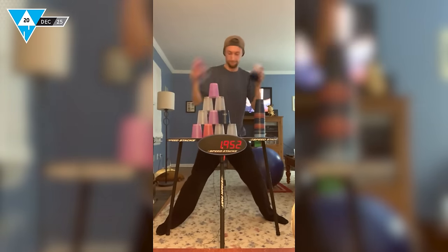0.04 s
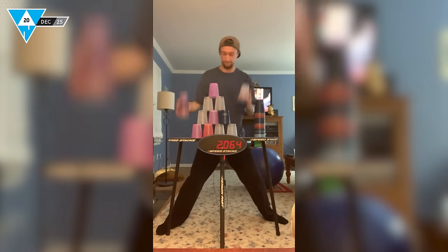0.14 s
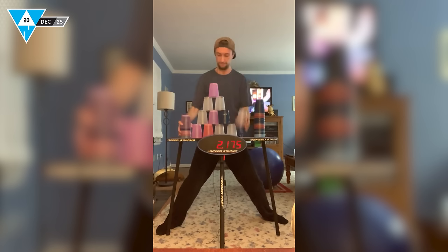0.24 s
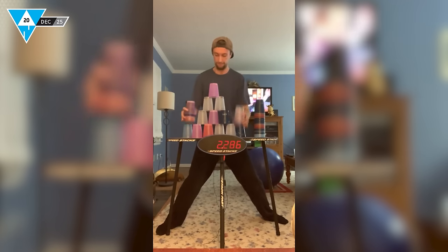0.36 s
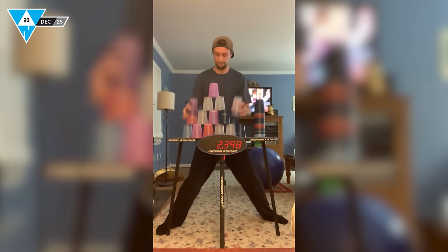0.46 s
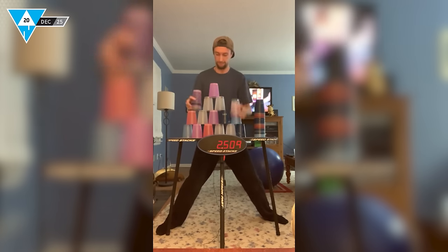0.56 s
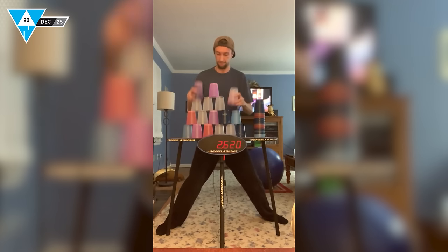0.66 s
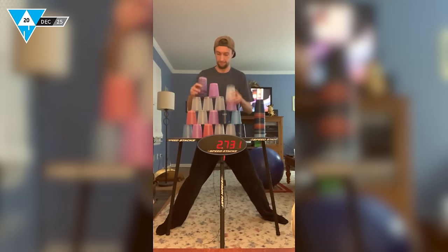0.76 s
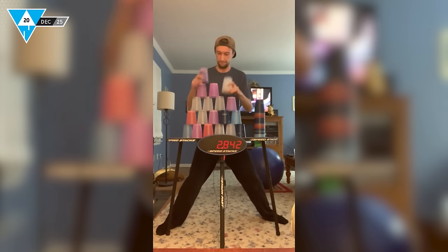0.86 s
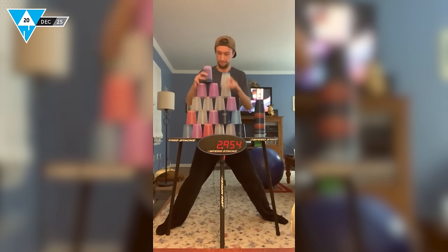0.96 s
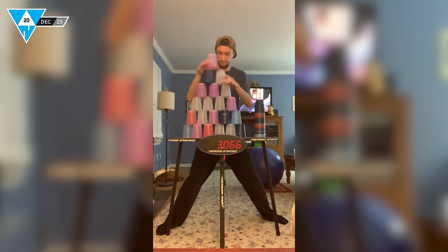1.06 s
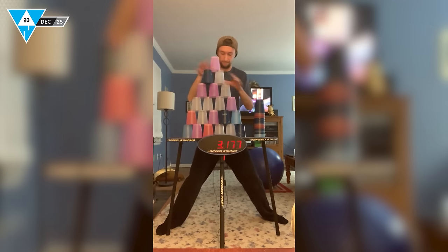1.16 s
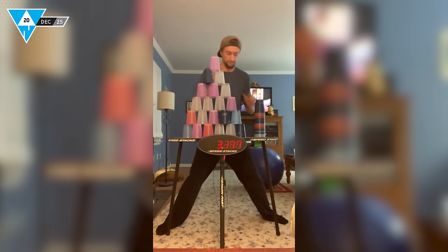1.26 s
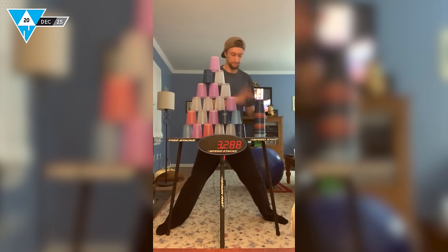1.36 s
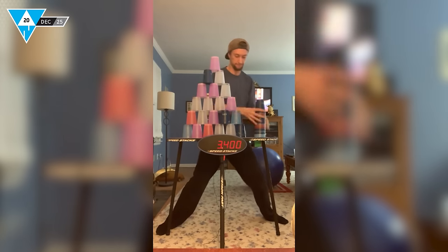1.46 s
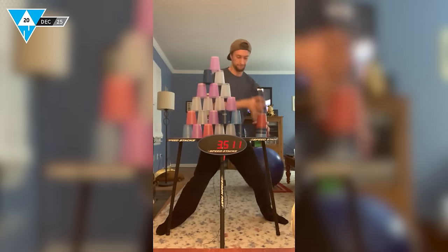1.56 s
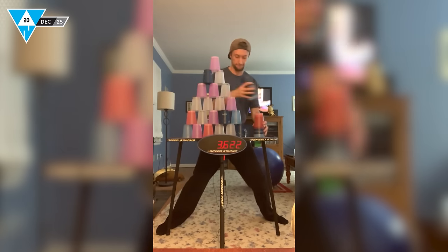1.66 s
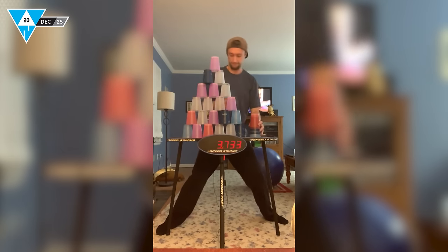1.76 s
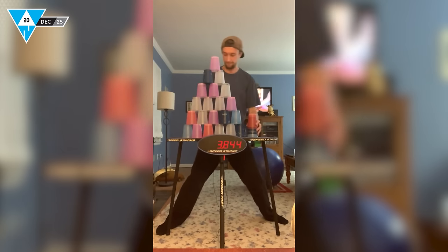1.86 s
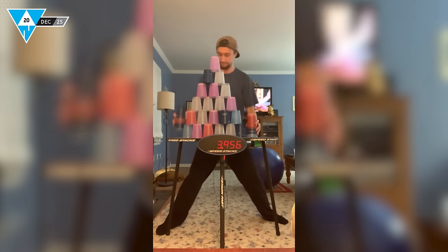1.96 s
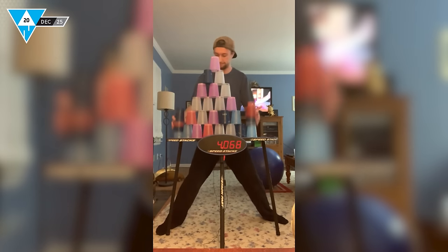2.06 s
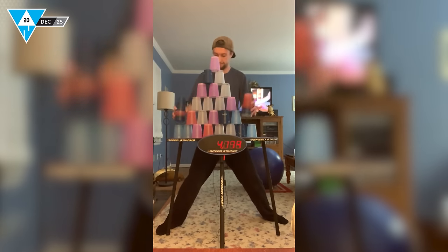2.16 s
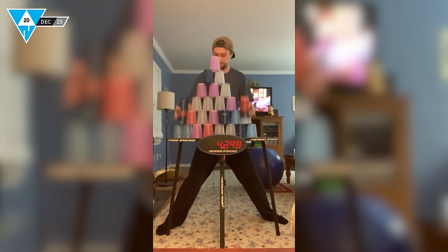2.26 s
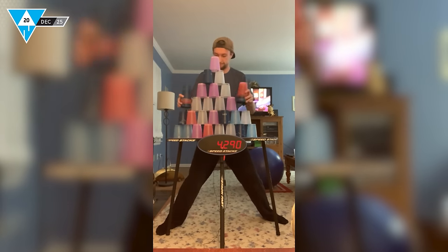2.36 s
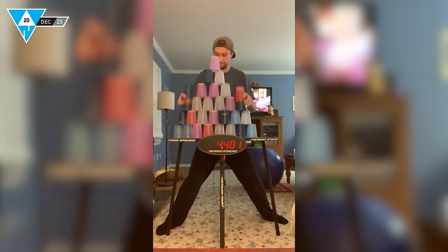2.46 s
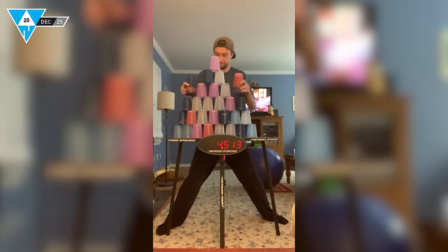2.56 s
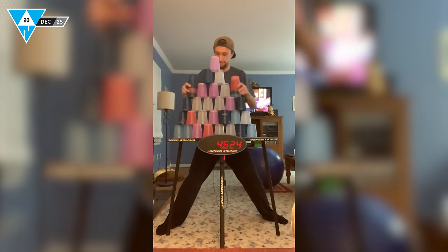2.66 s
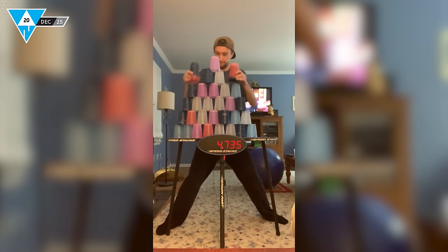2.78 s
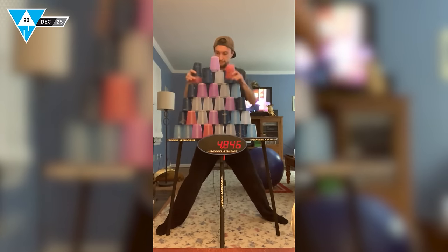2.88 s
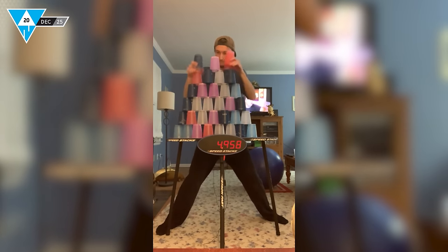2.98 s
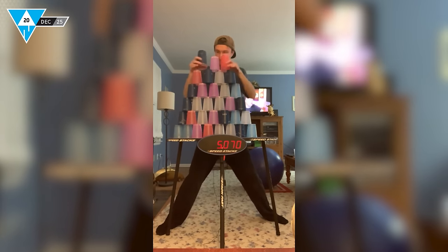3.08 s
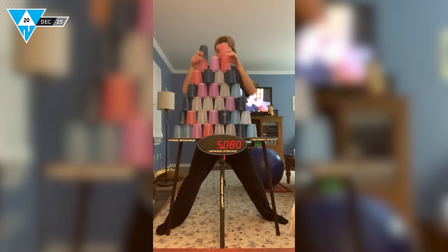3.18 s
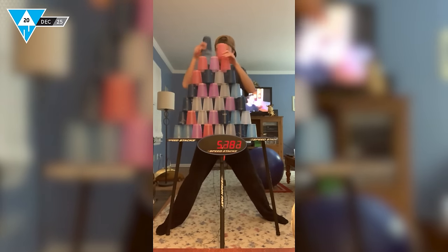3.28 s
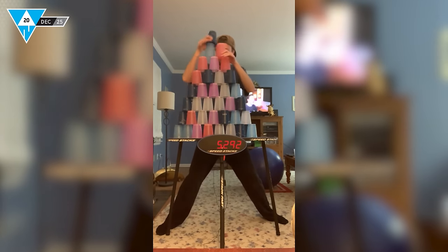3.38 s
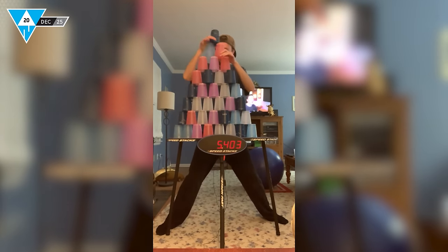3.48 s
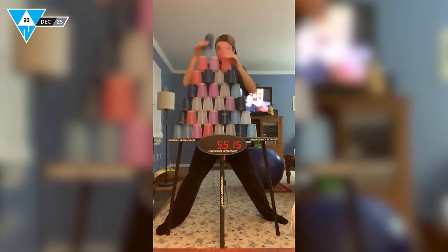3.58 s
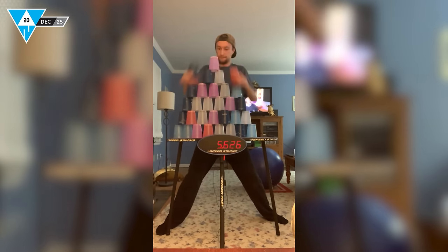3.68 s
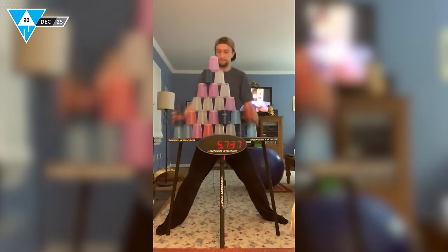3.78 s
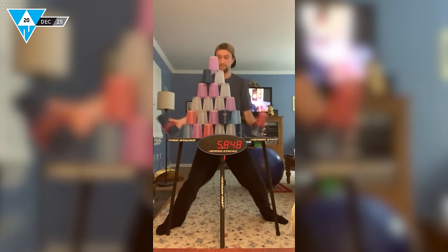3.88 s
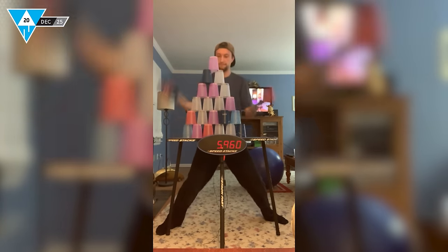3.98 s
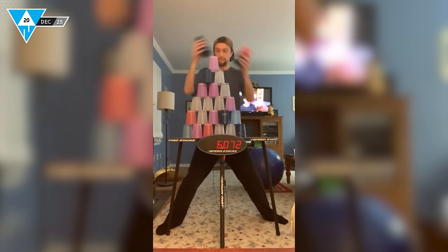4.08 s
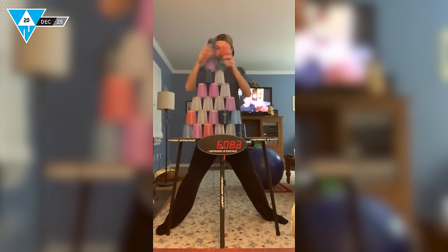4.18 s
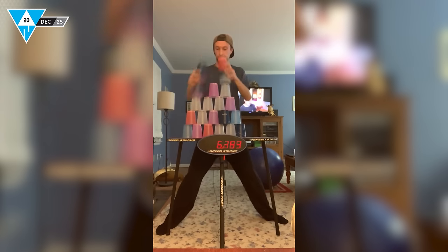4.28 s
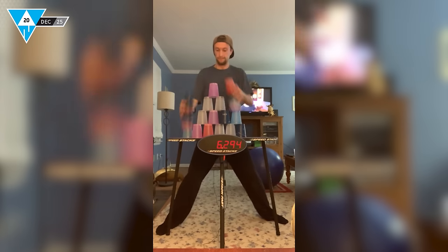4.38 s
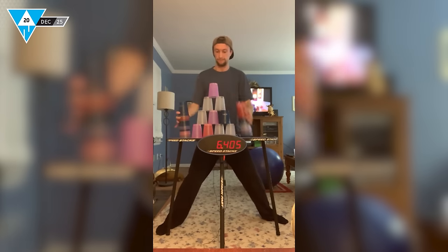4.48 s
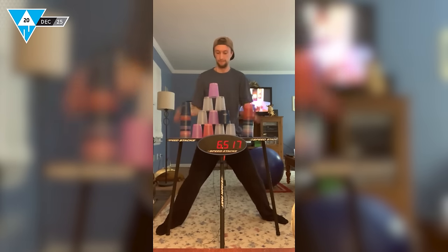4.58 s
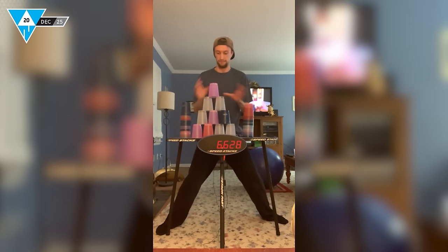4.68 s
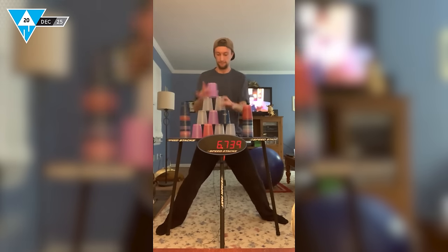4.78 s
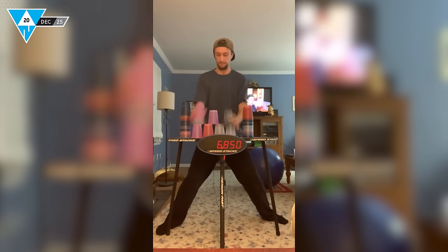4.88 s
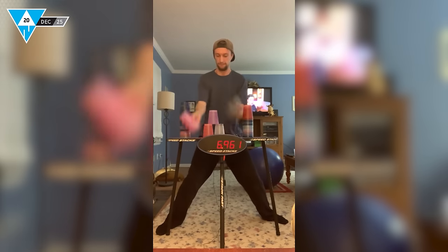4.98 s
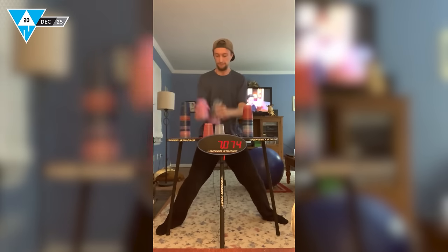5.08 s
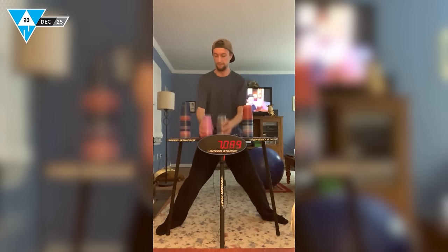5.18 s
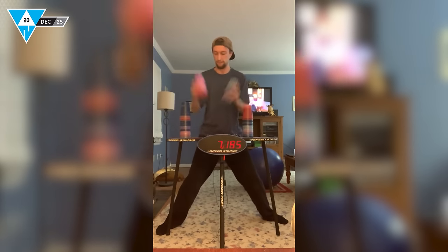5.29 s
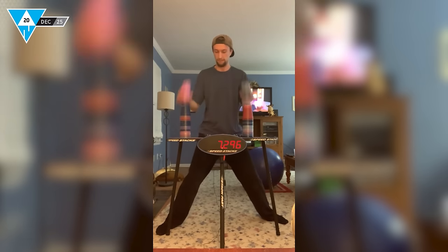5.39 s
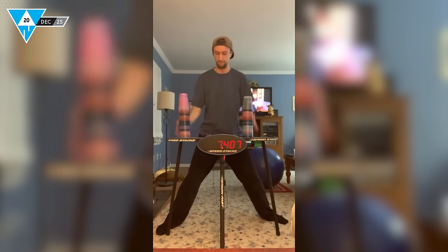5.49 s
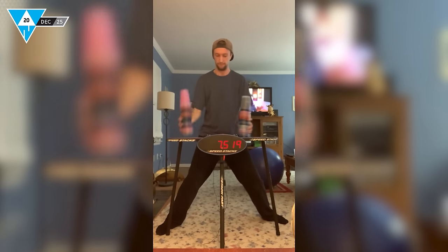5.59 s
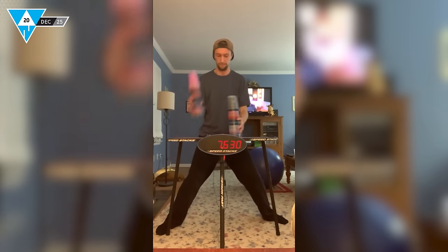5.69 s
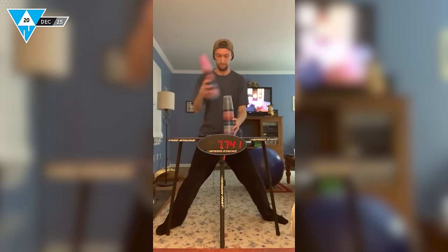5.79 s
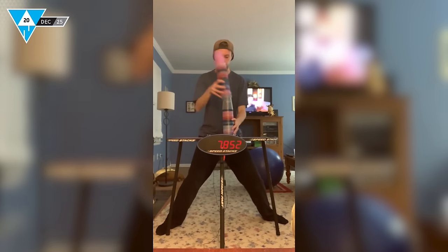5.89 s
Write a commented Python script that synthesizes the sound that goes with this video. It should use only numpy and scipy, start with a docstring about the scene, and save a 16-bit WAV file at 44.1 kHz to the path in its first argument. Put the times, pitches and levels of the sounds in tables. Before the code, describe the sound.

A living room with a quiet, steady rush of air, heard in stereo from a couple of metres away. From about 0.3 to 1.2 s, plastic cups rasp off a stack and land in quick, light, hollow clacks, the first ones set on the table. A near-quiet gap follows until 2.1 s, with only faint dull hand brushing. At 2.1-2.5 s cups tap down on the table, then from 2.7 to 3.5 s more scrapes and brisk clacks build. At 3.65-3.9 s a loud rasping sweep rattles cups together, with sharp rim clashes. After a soft shuffle and faint hum, another dense collapse runs 4.2-4.55 s, ending in hollow nesting pops and table booms. A lull, then tight bursts at 4.8-5.2 s, the strongest clack near 5.15 s. One hard double clack lands at 5.47 s, then faint brushing, and a weak last touch at 5.92 s. Short room echoes trail each hit.

```python
"""A living room: plastic cups are speed-stacked on a light table, a couple of metres from the microphone.
Each cup rasps off its stack as a train of friction slips and lands with a hollow clack of damped modes.
Then the pyramids are swept down, cups rasping and rattling into one another; heavy landings boom the table.
Hands brush the cups as dull grainy noise, moving cups hum faintly as short sines, and all of it
echoes in a room of decaying noise over a quiet steady rush of filtered noise."""
import sys
import numpy as np
from scipy import signal
from scipy.fft import rfft, irfft
from scipy.io import wavfile
from scipy.ndimage import uniform_filter1d

SR = 44100
rng = np.random.default_rng(int(sys.argv[2]) if len(sys.argv) > 2 else 0)


def file_out(sig):
    """Save sig as 16-bit WAV at sys.argv[1]."""
    # one column per channel
    cols = np.atleast_2d(sig).T
    # limit, then scale
    lim = np.clip(cols, -1, 1)
    pcm = np.round(lim * 32767).astype(np.int16)
    wavfile.write(sys.argv[1], SR, pcm)


N = 261954
HZ = np.fft.rfftfreq(N, 1 / SR)
TIME = np.arange(N) / SR
LEAD_S = .012  # room ahead of each contact for the rim's first grazing
RELEASE_S, HUSH_DB = 0.11, 40  # a rub dies away in this time; its rise and its release each span this many dB


def gain_of(db):
    """Decibels to amplitude."""
    return 10 ** (np.asarray(db) / 20)


def evened(x):
    """Scales to rms 1."""
    return x / np.sqrt(np.mean(x ** 2) + 1e-20)


def read(points, hz):
    """Reads a table on a log-frequency axis."""
    f, value = np.transpose(points)
    return np.interp(np.log(hz + 1), np.log(f + 1), value)


def add(mix, s, sound):
    """Mixes a sound in at time s."""
    part = mix[:, max(round(s * SR), 0):][:, :sound.shape[1]]
    part += sound[:, :part.shape[1]]


def colour(x, points, size=1024):
    """Causal minimum-phase filter with the given spectrum."""
    hz = abs(np.fft.fftfreq(size, 1 / SR))
    log_gain = np.log(gain_of(read(points, hz)))
    taps = np.fft.ifft(np.exp(np.conj(signal.hilbert(log_gain)))).real
    return signal.fftconvolve(x, taps[None], axes=1)[:, :x.shape[1]]


def clacks(detune=.07, boost_db=4.0, tick_s=0.00091, chatter=0.64, push_s=0.0012, board_db=-23, size=4096):
    """A rim meets table or cup with a tiny chatter, then rim, wall and enclosed air ring briefly."""
    # modes of a cup's enclosed air, its wall and its rim: (frequency [Hz], level [dB], t60 [s])
    hollow_modes = [(440, -2.5, 0.02), (510, -3, 0.041), (588.4, 2.5, 0.037), (670, 1, 0.015)]
    wall_modes = [(776.5, -3.3, 0.03), (850, 7.5, 0.016), (955, 0.7, 0.02), (1167.5, -6.5, 0.0057),
                  (1267.5, 6.6, 0.021), (1341, -8, 0.023)]
    rim_modes = [(1653, 8, 0.0092), (1940, 0, 0.012), (2170, -2.5, 0.012), (2400, -4.5, 0.012),
                 (2633, 1.5, 0.011), (3017, -0.5, 0.0096), (3264, -1, 0.014), (3760, -4.5, 0.0072),
                 (4284, 4, 0.0079)]
    # dull knock of the table top under a cup: (frequency [Hz], level [dB], t60 [s])
    board_modes = [(150, -2, 0.027), (189, -8.5, 0.034), (316, -19, 0.054)]
    # spectrum of the bare contact tick: (frequency [Hz], level [dB])
    tick_spectrum = [(1000, -25.5), (3000, 2.5), (4400, -0.5), (6500, 6), (9000, 0), (12500, -4.5),
                     (16000, -17)]
    out, t = np.zeros((3, N)), np.arange(size) / SR
    swell = 1 - np.exp(-t / push_s)  # the modes take a moment to get going
    blow_samples = .012 * SR
    for s, ring_hz, (hollow_db, wall_db, rim_db, tick_db) in blows():
        contact = (t == 0) + chatter * rng.standard_normal(size) * np.exp(-t / tick_s)
        tick = rfft(colour(contact[None], tick_spectrum)) * seating(graze_db=-18, graze_s=0.0022)

        cup = favoured(detuned(hollow_modes + wall_modes + rim_modes, detune), ring_hz, boost_db)
        hollow, wall, rim = np.split(cup, [len(hollow_modes), len(hollow_modes + wall_modes)])
        bodies = detuned(board_modes, 2 * detune), hollow, wall, rim
        rings = rfft(np.array([swell * ring(modes, t) for modes in bodies])) * seating()

        parts = np.vstack([rings, tick])
        heard = irfft(parts[:, None] * nearby())
        # every part starts out equally strong in each channel
        heard /= np.sqrt((heard ** 2).sum(2, keepdims=True) / blow_samples)
        # the push that sounds the hollow also knocks the board under the cup
        levels = [hollow_db + board_db, hollow_db, wall_db, rim_db, tick_db]
        add(out, s - LEAD_S, np.tensordot(gain_of(levels), heard, 1))
    return out


def blows(middle_hz=900, hollow_db_per_octave=-7):
    """Every contact as (s, ring Hz, dB of hollow, wall, rim and tick); hardness favours rim and tick."""
    # how each kind of blow shares its strength: (hollow [dB], wall [dB], rim [dB], contact tick [dB])
    table_voice = (-1.5, -7, -20.5, -17)
    rock_voice = (-3, -1, -6, -13.5)
    clack_voice = (-7.5, -1, -10.5, -14)
    clash_voice = (-12, -9.5, -2, -2.5)
    nest_voice = (-1.5, -9.5, -3.5, -8)
    # a cup is set on the table and rocks onto its other edge:
    # (time [s], strength [dB], ring [Hz], delay of second touch [s], second touch re first [dB])
    set_downs = [(.286, -29.5, 655, .005, -2.5), (.477, -23, 679, .007, -10),
                 (2.095, -34.5, 570, .007, -18), (2.291, -25.5, 690, .012, 2.5),
                 (2.498, -23.5, 757, .006, 3)]
    # a cup lands on other cups: (time [s], strength [dB], ring [Hz], hardness [dB])
    landings = [(.577, -17.5, 735, -1), (.652, -24, 670, -5), (.773, -19, 738, 2), (.864, -29.5, 653, -2),
                (.903, -34, 670, -1), (.97, -19, 848, -0.5), (1.019, -23.5, 1184, -2),
                (1.124, -20.5, 1280, -5.5), (1.162, -19.5, 780, 3), (1.166, -21.5, 1293, -4.5),
                (1.565, -57, 1070, 5), (1.666, -53.5, 480, 2.5), (2.705, -23, 1220, -2),
                (2.722, -22.5, 850, -1.5), (2.906, -22.5, 1160, -1.5), (2.955, -22, 670, 0.5),
                (3.11, -21.5, 870, 1), (3.174, -24.5, 690, 3), (3.306, -27.5, 1470, -3),
                (3.378, -25, 1320, -7), (3.41, -30, 1220, 1), (3.439, -35, 593, -1),
                (3.505, -41, 1170, -1.5), (3.518, -15, 1280, -5), (3.538, -30.5, 1330, 7),
                (3.684, -16.5, 1020, -5.5), (3.69, -18.5, 1350, -9), (3.766, -22, 970, -1),
                (3.823, -16, 522, 5), (4.249, -19, 1180, 0), (4.331, -18, 597, 5.5),
                (4.364, -24.5, 472, 6.5), (4.846, -27.5, 1310, -18), (4.885, -18, 900, -0.5),
                (4.911, -16.5, 930, 7), (5.089, -52, 940, -2), (5.144, -12, 783, 2.5),
                (5.472, -16, 1215, 5.5)]
    # rims clash as cups are gathered: (time [s], strength [dB], ring [Hz], sharpness of the tick [dB])
    clashes = [(.296, -26.5, 2780, -14), (0.32, -33, 2660, -10.5), (3.631, -42.5, 1610, 11),
               (3.673, -24.5, 3320, 3), (3.703, -19, 3300, -7.5), (3.722, -22, 2180, 2),
               (3.787, -22, 1563, -9), (3.796, -24, 4430, 0.5), (3.801, -19, 3330, 1),
               (4.194, -55, 3180, 5), (4.221, -51, 3300, 9.5), (4.298, -22.5, 3380, 1),
               (4.38, -25.5, 1630, -4.5), (4.425, -27.5, 2700, 4.5), (4.534, -29.5, 1660, 5),
               (4.787, -38, 1570, -6), (4.917, -20, 2700, 1), (4.982, -28.5, 2730, 5),
               (5.442, -50.5, 2660, 7.5), (5.467, -19, 2560, -4.5), (5.916, -46, 3500, -3)]
    # a cup drops home into a stack and the trapped air pops:
    # (time [s], strength [dB], ring [Hz], hardness [dB])
    nestings = [(3.866, -27, 585, 4), (4.419, -24.5, 670, 5.5), (4.436, -25.5, 700, -1),
                (4.468, -18, 440, -2.5), (4.473, -17.5, 480, -2.5), (4.54, -25.5, 603, 4),
                (4.861, -35, 648, -5.5), (4.957, -24, 528, -8), (4.992, -35.5, 510, 9),
                (5.108, -21, 700, -2.5), (5.15, -21, 530, -9), (5.157, -19.5, 500, -8),
                (5.189, -18, 484, 3)]
    hollow, wall, rim, tick = np.eye(4)
    edge = rim + tick
    for s, db, hz, rock_s, rock_db in set_downs:
        yield s, hz, db + np.array(table_voice)
        yield s + rock_s, hz, db + rock_db + np.array(rock_voice)
    for s, db, hz, hardness in landings:
        # a clack that rings higher stirs the hollow less
        tilt = hollow_db_per_octave * np.log2(hz / middle_hz) * hollow
        yield s, hz, db + np.array(clack_voice) + hardness * edge + tilt
    for s, db, hz, sharpness in clashes:
        yield s, hz, db + np.array(clash_voice) + sharpness * tick
    for s, db, hz, hardness in nestings:
        yield s, hz, db + np.array(nest_voice) + hardness * edge


def detuned(modes, spread):
    """Grip and load shift every mode a little from blow to blow."""
    hz, db, t60 = np.transpose(modes)
    return np.transpose([hz * (1 + spread * rng.uniform(-1, 1, len(hz))), db, t60])


def favoured(modes, ring_hz, boost_db):
    """Which cup is struck, and where, singles out one ring: the nearest mode is pulled to it and grows."""
    hz, db, t60 = np.transpose(modes)
    nearest = np.arange(len(hz)) == np.argmin(abs(hz - ring_hz))
    return np.transpose([np.where(nearest, ring_hz, hz), db + boost_db * nearest, t60])


def ring(modes, t):
    """Damped modes, weighted a little differently at each point of contact."""
    hz, db, t60 = np.transpose(modes)[:, :, None]
    weight = rng.choice([-1, 1], hz.shape) * rng.uniform(.7, 1.3, hz.shape)
    return (weight * gain_of(db - 60 * t / t60) * np.sin(2 * np.pi * hz * t)).sum(0)


def seating(graze_db=-11, graze_s=0.0054, size=4096):
    """A rim never lands flat: it grazes, seats and rocks within milliseconds. Spectrum of that force."""
    t = np.arange(size) / SR - LEAD_S
    graze = rng.standard_normal(size) * np.exp(-abs(t) / graze_s)
    seat = np.arange(size) == round(LEAD_S * SR)
    return rfft(seat + gain_of(graze_db) * graze / np.linalg.norm(graze))


def nearby(first_s=.0025, last_s=.0105, echo_db=-4, fade_db_per_s=900, spread_s=0.000563, count=9, size=4096):
    """One cup's place: left and right with first echoes of table and walls, then the plain path to the room."""
    hz = np.fft.rfftfreq(size, 1 / SR)
    delay = first_s + (last_s - first_s) * (np.arange(count) + rng.random(count)) / count
    delay = delay + spread_s * rng.uniform(-1.048, 1, (2, count))  # each channel hears its own delays
    height = gain_of(echo_db - fade_db_per_s * delay)
    height = height * rng.choice([-1, 1], count) * rng.uniform(.5, 1.5, (2, count))
    pair = 1 + (height[..., None] * np.exp(-2j * np.pi * delay[..., None] * hz)).sum(1)
    return np.vstack([pair, np.ones(len(hz))])


def sliding(slips_per_s=500, spread_db=5, hiss=0.31, size=4096, count=6):
    """Cup walls rasp over each other in tiny slips at several places on the table."""
    # a cup slides off the stack in the hand, fastest at first: (time [s], length [s], friction [dB])
    peels = [(0.284, 0.026, -43), (0.376, 0.24, -47.5), (0.563, .15, -41), (0.716, 0.1, -45),
             (0.952, 0.33, -45.5), (2.096, 0.083, -44), (2.286, 0.098, -46), (2.345, 0.18, -44),
             (2.497, 0.15, -36.5), (2.704, 0.23, -46), (2.907, .12, -50.5), (3.161, 0.12, -40),
             (3.39, 0.089, -41), (3.506, .07, -60), (5.68, 0.2, -56.5)]
    # the hands sweep cups down into stacks: (time [s], length [s], friction [dB], run-up [s])
    sweeps = [(3.676, 0.17, -20.5, 0.092), (4.2, 0.047, -42, .012), (4.254, 0.29, -26, 0.017),
              (4.899, 0.079, -24, 0.12), (5.101, 0.056, -24.5, .004), (5.466, 0.022, -24.5, 0.036),
              (5.92, 0.022, -39, 0.0025)]
    # spectrum of the rasp: (frequency [Hz], level [dB])
    rasp = [(100, -39), (300, -16), (500, -6), (900, 8), (1300, 9.5), (1600, -17), (2000, 3.5), (3400, 1.5),
            (4500, -3), (6500, -3.5), (9000, -7.5), (12500, -7.5), (16000, -18)]
    level = sum(stroke(*peel, rise_s=0.028, sag_db=23) for peel in peels)
    level = level + sum(stroke(*sweep, sag_db=5.5) for sweep in sweeps)
    out = np.zeros((3, N))
    for _ in range(count):
        rub = slipping(slips_per_s / count, spread_db) + hiss * rng.standard_normal(N)
        rub = evened(colour(rub[None], rasp)) * level * lumps()
        paths = irfft(nearby(size=size))
        paths = paths / np.linalg.norm(paths, axis=1, keepdims=True)
        out += signal.oaconvolve(rub, paths, axes=1)[:, :N]
    return out / np.sqrt(count)


def stroke(s, length, db, rise_s, sag_db):
    """Gain of one rubbing movement: it speeds up, slows steadily while it lasts, and lets go."""
    times = s + np.array([-rise_s, 0, length, length + RELEASE_S])
    levels = db - np.array([HUSH_DB, 0, sag_db, sag_db + HUSH_DB])
    return gain_of(np.interp(TIME, times, levels)) * (TIME >= times[0]) * (TIME <= times[-1])


def slipping(per_s, spread_db):
    """A train of tiny friction slips, mostly small and now and then large."""
    size = gain_of(spread_db * np.minimum(rng.exponential(1, N), 3))
    slips = size * (rng.random(N) < per_s / SR)
    return evened(slips * rng.choice([-1, 1], N))


def lumps(depth_db=4.0, size=330):
    """The rub catches and frees many times a second: a gain from smoothed noise."""
    drift = evened(uniform_filter1d(rng.standard_normal(N), size))
    return evened(gain_of(depth_db * drift))


def table(level_db=-5, rise_s=0.00067, detune=0.1):
    """The light table booms and wobbles in its own low modes under the heavier landings."""
    # heavy landings, ahead of the overall trim: (time [s], level [dB])
    thumps = [(0.289, -43), (1.165, -49.5), (2.102, -48), (2.297, -65), (2.498, -60), (3.684, -45),
              (3.827, -36), (4.253, -31.5), (4.331, -27.5), (4.474, -33), (4.911, -47), (4.992, -36.5),
              (5.156, -32), (5.193, -54), (5.478, -28.5), (5.928, -48)]
    # modes of the table: (frequency [Hz], level [dB], t60 [s])
    table_modes = [(59, -3.5, 0.39), (70.6, -8.5, 0.38), (124, -1, 0.14), (156, -.5, 0.19),
                   (213.5, 1.5, 0.12), (287.5, 4.5, 0.11), (398.5, 4.5, 0.09)]
    out, t = np.zeros((3, N)), np.arange(SR) / SR
    onset = 1 - np.exp(-t / rise_s)
    for s, db in thumps:
        boom = gain_of(db + level_db) * ring(detuned(table_modes, detune), t) * onset
        add(out, s, boom[None])
    return out


def handling(level_db=-1, slips_per_s=400, spread_db=4, hiss=0.2):
    """Hands and sleeves brush the cups between moves: a soft, dull, grainy shuffle of slips and hiss."""
    # brushing moves, and at 0 s the fading end of an earlier sound, ahead of the overall trim:
    # (time [s], length [s], level [dB])
    brushes = [(0, 0.026, -53), (1.521, 0.16, -55.5), (1.67, 0.15, -64), (1.894, 0.073, -67),
               (1.988, 0.016, -67), (3.924, 0.13, -43.5), (4.65, 0.57, -58.5), (5.414, 0.43, -55)]
    # spectrum of the shuffle: (frequency [Hz], level [dB])
    sleeves = [(60, 7.5), (200, -3), (380, 4.5), (700, 2.5), (1300, 1), (1700, -4), (3000, -8.5),
               (7000, -16), (11000, -25.5), (16000, -37.5)]
    brush = np.array([slipping(slips_per_s, spread_db) for _ in range(3)])
    brush = brush + hiss * rng.standard_normal((3, N))
    level = sum(stroke(*row, rise_s=.04, sag_db=8.5) for row in brushes)
    return gain_of(level_db) * level * evened(colour(brush, sleeves))


def humming(swing_s=0.048):
    """Air passing the mouth of a moving cup sounds its cavity for a moment."""
    # an open cup hums faintly as it is swung: (time of the middle [s], frequency [Hz], level [dB])
    hums = [(2.07, 431, -68.5), (4.152, 510, -57.5), (5.871, 510, -59)]
    out = np.zeros(N)
    for s, hz, db in hums:
        swing = np.exp(-((TIME - s) / swing_s) ** 2)
        out += gain_of(db) * swing * np.sin(2 * np.pi * hz * TIME)
    return out


def room(x, wet_db=-6.0, start_s=.011, linger_db=-24, linger_t60=0.76, count=26):
    """Dense echoes, dying band by band over a faint longer ring, from random tails that crossfade regularly."""
    # decay of the room: (frequency [Hz], t60 [s])
    room_t60 = [(100, 0.72), (300, 0.42), (700, 0.3), (1300, 0.33), (2000, 0.28), (5000, 0.27), (9000, 0.2),
                (15000, 0.19)]
    # faint long ring of the furnishings, ahead of linger_db: (frequency [Hz], level [dB])
    linger_spectrum = [(100, -11.5), (450, 3), (900, -15), (1300, -1), (1700, -0.5), (7000, -3.5),
                       (15000, -21.5)]
    t, out = np.arange(SR) / SR, np.zeros((2, N))
    step = N // count
    for k in range(count + 1):
        hz, age, z = signal.stft(diffuse(rng.standard_normal((2, SR))), SR, nperseg=256)
        decay = gain_of(-60 * age / read(room_t60, hz)[:, None])
        linger = gain_of(linger_db + read(linger_spectrum, hz)[:, None] - 60 * age / linger_t60)
        tail = signal.istft(z * np.hypot(decay, linger), SR, nperseg=256)[1][:, :SR] * (t > start_s)
        tail = tail / np.linalg.norm(tail[0])
        span = np.arange(max((k - 1) * step, 0), min((k + 1) * step, N))
        share = np.cos(np.pi / 2 * (span / step - k))  # each tail fades into the next
        add(out, span[0] / SR, signal.fftconvolve((x[span] * share)[None], tail, axes=1))
    return gain_of(wet_db) * out


def diffuse(pair, alike_hz=430):
    """Long waves reach both channels nearly alike, short ones unrelated."""
    hz = np.fft.rfftfreq(pair.shape[1], 1 / SR)
    same = .93 / (1 + (hz / alike_hz) ** 4)
    a, b = rfft(pair)
    return irfft(np.array([a, same * a + np.sqrt(1 - same ** 2) * b]), pair.shape[1])


def air(level_db=-72):
    """The quiet steady rush of the room: filtered noise."""
    # spectrum of the rush: (frequency [Hz], level [dB])
    rush = [(55, 21), (120, 11), (220, -3), (700, -12.5), (1000, -2.5), (1280, -13), (1600, -21.5),
            (2120, 9.5), (2300, -8), (2700, -13.5), (8000, -16), (11000, -21), (16000, -28.5)]
    noise = diffuse(rng.standard_normal((2, N)))
    return gain_of(level_db) * evened(irfft(rfft(noise) * gain_of(read(rush, HZ)), N))


def scene():
    """Cups, hands and table, heard directly and through the room."""
    left, right, outward = clacks() + sliding() + handling() + humming() + table()
    return np.array([left, right]) + room(outward) + air()


def record(dry, ceiling=1.0, right_lag_s=5.5e-5, edge_hz=16000):
    """The right channel lags slightly; width is set by frequency; the highest peaks are rounded; then a low-pass."""
    # side over mid gain of the stereo sound: (frequency [Hz], gain [dB])
    side_over_mid = [(50, -2.5), (130, 1.5), (270, 0.5), (550, 0.5), (1200, 2.5), (3000, 3), (6000, -4),
                     (9000, 13), (11500, -2.5), (16000, -27)]
    left, right = rfft(dry)
    right = right * np.exp(-2j * np.pi * HZ * right_lag_s)
    width = gain_of(read(side_over_mid, HZ))
    mid, side = (left + right) / 2, width * (left - right) / 2
    pair = irfft(np.array([mid + side, mid - side]) / np.sqrt((1 + width ** 2) / 2), N)
    rounded = pair / (1 + (pair / ceiling) ** 4) ** (1 / 4)
    low_pass = signal.firwin(255, edge_hz, window=("kaiser", 8), fs=SR)
    return signal.oaconvolve(rounded, low_pass[None], "same", axes=1)


dry = scene()
out = record(dry)
file_out(out)
```